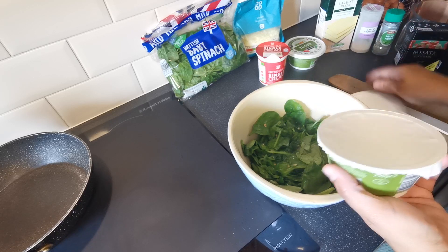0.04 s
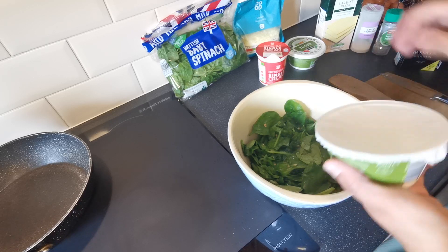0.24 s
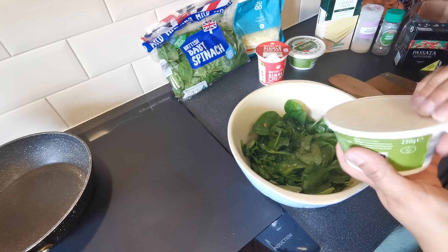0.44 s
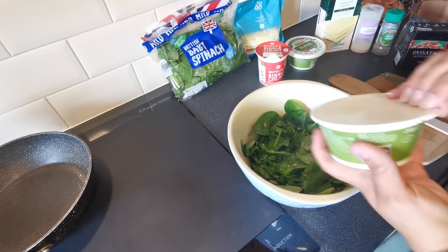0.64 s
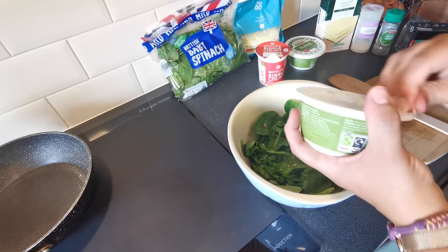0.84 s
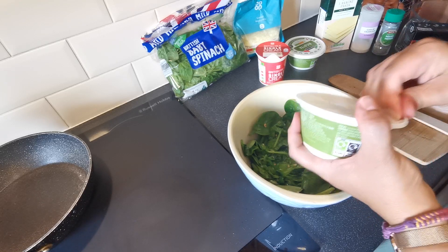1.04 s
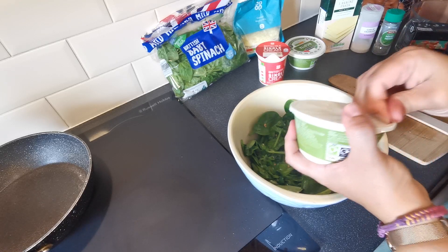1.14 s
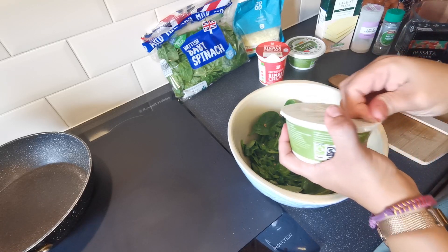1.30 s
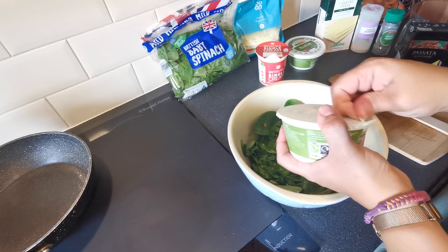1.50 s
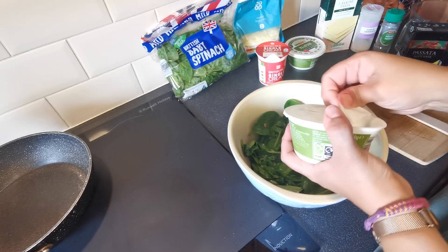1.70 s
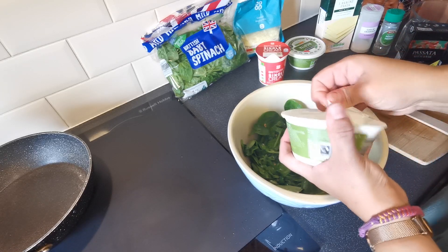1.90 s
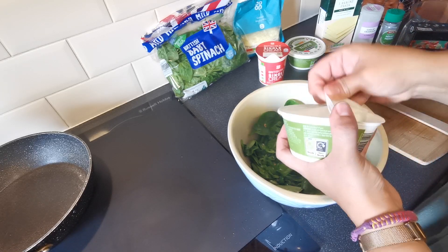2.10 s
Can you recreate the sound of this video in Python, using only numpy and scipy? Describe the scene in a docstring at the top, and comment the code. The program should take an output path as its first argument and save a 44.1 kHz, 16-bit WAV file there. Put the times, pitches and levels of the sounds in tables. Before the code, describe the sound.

A plastic tub is opened close by, slightly to the right, in a kitchen. At 0.2 seconds its lid drops on a wooden board and rattles to rest by 0.4. Fingers pick at the film seal, with sharp clicks near 0.6 and 1.0. From about 1.4 the seal peels with crinkles and pops, snapping again near 1.8 and 2.0. A faint, low appliance hum runs underneath.

```python
"""Dropped lid and peeled seal

A plastic lid drops on a wooden board in a tiled kitchen and rattles to rest. Fingers then pick at
a tub's film seal and peel it back: the glue lets go in tiny slips, the film crinkles and snaps,
and the thin tub pops. A low appliance hum runs underneath; the hands are near the right microphone."""
import sys
import numpy as np
from scipy import signal
from scipy.fft import rfft, irfft
from scipy.io import wavfile

SR = 44100
rng = np.random.default_rng(int(sys.argv[2]) if len(sys.argv) > 2 else 0)


def int16_out(signal):
    """Quantize to a 16-bit WAV file."""
    q = np.round(np.clip(np.atleast_2d(signal).T, -1, 1) * 32767)
    wavfile.write(sys.argv[1], SR, q.astype(np.int16))


N = 94815

# The lid's bounces. Each row: start in seconds, then thud, ring, crack and room echo levels in dB.
BOUNCES = [(0.2003, -30.5, -15, -25.5, 5.5), (0.2019, -24.5, -18.5, -10.5, 1.5),
           (0.208, -15, -32, -12.5, 0), (.2122, -19.5, -18.5, -32, 3), (0.2187, -48, -13.5, -14, 2.5),
           (.2252, -32.5, -20, -0.5, -2), (.2326, -39.5, -21, -21, -12), (0.3083, -44.5, -18, -19.5, 2),
           (0.3172, -34, -28, -22, 4.5), (0.3219, -39, -23.5, -41, -2), (.356, -58, -25.5, -30.5, 1.5),
           (.378, -61.5, -28, -28, 2), (.402, -42.5, -30.5, -48.5, 0)]
# The lasting notes of the lid and of nearby kitchenware ringing along.
# Each row: pitch in Hz, relative level in dB, seconds to fade by 60 dB.
RINGING_NOTES = [(1760, 0, .07), (1977, -1, .14), (2125, 1, .13), (2295, -5, .1), (3492, -9, .1),
                 (4266, -6, .08), (4556, -3, .09), (5521, -5, .09), (5647, -6, .09), (6769, -12, .08)]
# The tone of the board, the lid and its edge. Each row: frequency in Hz, relative level in dB.
BOARD_TONE = [(100, -32.5), (200, -13), (270, 7), (340, -6), (500, -5), (700, -9.5), (1250, -8),
              (2000, -21), (6000, -64)]
LID_TONE = [(300, -32.5), (900, -20), (1250, -14), (1550, -11.5), (1780, -3.5), (2150, 0.5), (2700, -5),
            (3500, -4.5), (6000, -21), (15000, -39.5)]
EDGE_TONE = [(300, -46.5), (1500, -27), (3300, -12), (4400, -3), (5300, -5), (6500, -9.5), (8200, -19.5),
             (11000, -12.5), (15500, -14)]


def dropped_lid():
    """Each bounce thumps the board, rings the lid and nearby kitchenware, and cracks at the lid's edge."""
    out, t = np.zeros((2, N)), np.arange(8192) / SR
    for start, thud_db, ring_db, crack_db, room_db in BOUNCES:
        notes = sum(amp(db - 60 * t / fade_s) * rng.choice([-1, 1]) * np.sin(2 * np.pi * hz * t)
                    for hz, db, fade_s in RINGING_NOTES)
        thud = amp(thud_db) * unit(colour(burst(fade_ms=2.3075, size=len(t)), BOARD_TONE))
        ring = amp(ring_db) * unit(colour(burst(fade_ms=3.145, size=len(t)), LID_TONE))
        ring += amp(ring_db - 5) * unit(notes)
        crack = amp(crack_db) * unit(colour(burst(fade_ms=0.4775, size=len(t)), EDGE_TONE))
        add(out, start, kitchen(thud + ring + crack, room_db))
    return out


# Snaps of tub and film. Each row: start in seconds, wall pitch in Hz, wall level in dB, rim pitch in Hz,
# rim band width in Hz, rim level in dB, film level in dB, fade time in milliseconds, room echo in dB.
SNAPS = [(0.0399, 1212, -60, 5797, 2996, -51.5, -47, 0.881, -5),
         (0.0797, 1199, -59.5, 5862, 3003, -50.5, -42, 0.3005, -8),
         (0.096, 1204, -67, 4974, 1992, -48.5, -50.5, 0.99, 5.5),
         (0.5041, 1177, -38.5, 2500, 2514, -43.5, -53, 0.5946, 3),
         (.5703, 1231, -51.5, 5647, 1463, -44, -45, 0.797, 3.5),
         (0.5946, 1100, -40.5, 3980, 3035, -40.5, -34.5, 1.541, 1.5),
         (0.603, 1516, -45, 5459, 1492, -33.5, -37.5, 1.716, 11),
         (.609, 1954, -29.5, 5671, 900, -11.5, -8, 1.1526, -6.5),
         (0.9079, 1482, -39, 5616, 3478, -28, -22.5, 2.1, 1.5),
         (0.9142, 1204, -37, 5616, 3478, -29, -26, 1.284, -1.5),
         (.9315, 1497, -53, 5547, 3000, -40, -26, 0.84, -1),
         (0.9535, 1407, -35.5, 4056, 3002, -36.5, -39.5, 3.177, 4),
         (0.9561, 1244, -30.5, 5500, 2998, -40.5, -27, 0.5847, 1),
         (.9731, 798.6, -27.5, 4802, 2271, -13, -8, 0.3152, -2.5),
         (1.0006, 900, -16, 2970, 2496, -30.5, -41.5, 0.2467, -9),
         (1.006, 977.2, -21.5, 2896, 2483, -23.5, -47.5, 3, -1),
         (1.014, 1000, -48, 4007, 3000, -33, -25, 0.526, -14),
         (1.1232, 1160, -55.5, 5947, 3000, -61, -40.5, 0.504, -17),
         (1.1814, 2019, -44.5, 4498, 3036, -40, -40.5, 0.512, 0.5),
         (1.278, 770.5, -38, 4000, 3000, -51.5, -54, 0.7474, 2.5),
         (1.2944, 1164, -34.5, 5604, 3467, -33.5, -33, 1.429, -3.5),
         (1.4231, 1800, -58, 5880, 1500, -27.5, -27.5, 1.458, 2.5),
         (1.426, 1757, -43, 6025, 1781, -24.5, -39.5, 2.12, 4),
         (1.457, 1794, -51, 5822, 3003, -29.5, -34, 1.348, -3.5),
         (1.513, 1202, -48.5, 5969, 3000, -50, -35, 0.92, -10.5),
         (1.5176, 1192, -47, 5978, 2995, -43, -26.5, 0.684, -2.5),
         (1.5664, 1180, -58.5, 6426, 3004, -37.5, -25.5, 0.3007, -4.5),
         (1.569, 1111, -42, 6454, 3000, -40.5, -41, 0.821, 6.5),
         (1.595, 1142, -38.5, 6380, 3002, -34.5, -21, 0.1804, 4),
         (1.6238, 1204, -18, 5072, 2970, -25, -31.5, 10.474, 0.5),
         (1.6508, 1242, -20, 2856, 2970, -15, -17, 0.4205, -2.5),
         (1.6687, 1284, -28, 2404, 1502, -29.5, -30.5, 1.322, -10.5),
         (1.6925, 1296, -23.5, 2113, 900, -17.5, -33, 0.592, -4),
         (1.7189, 1138, -25, 2320, 1501, -34.5, -32.5, 1.504, 1.5),
         (1.7322, 1934, -31, 5113, 3043, -27.5, -25.5, 1.153, -2),
         (1.8416, 1422, -19.5, 5915, 1015, -10.5, -6.5, 1.037, -4),
         (1.8437, 1259, -26.5, 6275, 2545, -18.5, -8, 0.4045, 1.5),
         (1.924, 1161, -31.5, 3981, 3002, -33, -27.5, 1.4436, -5.5),
         (2.0452, 1833, -16, 6623, 2227, -16.5, -27.5, 0.6306, -3),
         (2.0456, 879.6, -33.5, 4607, 3050, -24, -28, 1.75, 2.5)]
# The tone of the rim and of the film. Each row: frequency in Hz, relative level in dB.
RIM_TONE = [(200, -28), (600, -12), (1100, -5), (2000, 1), (4000, -2), (7000, -2.5), (9000, -4),
            (16000, -17.5)]
FILM_TONE = [(500, -41.5), (2000, -22), (4000, -18.5), (8000, -14), (10500, -3), (13000, 0.5), (14200, -1),
             (15500, 0), (17000, -19)]


def tub_snaps():
    """Buckling plastic pops the tub wall, clicks the rim and ticks the film; the grip sets the pitches."""
    out = np.zeros((2, N))
    wall_spread = 1.2557  # the wall rings from this factor below its pitch to this factor above
    film_slower = 3.398  # the limp film crinkles this many times longer than the wall
    for start, wall_hz, wall_db, rim_hz, rim_width, rim_db, film_db, fade_ms, room_db in SNAPS:
        wall_band = signal.butter(2, [wall_hz / wall_spread, wall_hz * wall_spread], "bandpass", fs=SR)
        rim_band = signal.iirpeak(rim_hz, rim_hz / rim_width, fs=SR)
        pop = amp(wall_db) * unit(signal.lfilter(*wall_band, burst(fade_ms)))
        click = amp(rim_db) * unit(colour(signal.lfilter(*rim_band, burst(fade_ms)), RIM_TONE))
        tick = amp(film_db) * unit(colour(burst(fade_ms * film_slower), FILM_TONE))
        add(out, start, kitchen(pop + click + tick, room_db))
    return out


# Gripping, then peeling the seal. Each row: time in seconds, film crackle in dB, tub rasp in dB.
PEEL_LEVELS = [(0, -78, -88.5), (.09, -83, -88.5), (.11, -71.5, -73), (.17, -90, -75), (.74, -75, -80.5),
               (.8, -68.5, -71), (.88, -76.5, -71.5), (1.12, -76, -104.5), (1.4, -74.5, -79.5),
               (1.46, -59.5, -63.5), (1.55, -73, -87), (1.59, -63.5, -82.5), (1.61, -49, -62.5),
               (1.644, -53.5, -53.5), (1.663, -46, -43), (1.69, -62.5, -58), (1.72, -59, -53.5),
               (1.77, -64, -68.5), (1.82, -70.5, -68), (2.15, -80.5, -70)]
# The tone of the tub's rasp. Each row: frequency in Hz, relative level in dB.
RASP_TONE = [(200, -19), (650, -7.5), (1000, -6), (1250, -2.5), (1700, -7), (2300, 0.5), (3300, -11.5),
             (5200, -4.5), (8000, -15), (16000, -22.5)]


def peeling_seal():
    """The glue lets go in many tiny slips, which crackle in the film and rasp in the tub."""
    slips_per_second, spread_db = 2200, 4
    times, film_db, tub_db = np.transpose(PEEL_LEVELS)
    t = np.arange(N) / SR
    slips = (rng.random(N) < slips_per_second / SR) * rng.choice([-1, 1], N)
    slips = slips * amp(spread_db * np.minimum(rng.exponential(1, N), 4))  # a few are much louder
    crackle = amp(np.interp(t, times, film_db)) * unit(colour(slips, FILM_TONE))
    rasp = amp(np.interp(t, times, tub_db)) * unit(colour(slips, RASP_TONE))
    return kitchen((crackle + rasp) * np.sqrt(N), room_db=-3)[:, :N]


# How long the kitchen echoes. Each row: frequency in Hz, seconds to fade by 60 dB.
ECHO_FADE = [(200, 0.0008), (800, 0.3424), (2100, 0.2809), (5500, 0.3969), (9000, 0.318), (15000, 0.1571)]
# The tone of the echo. Each row: frequency in Hz, boost or cut in dB.
ECHO_TONE = [(200, 0.5), (900, -2), (2200, 0.5), (5500, -2), (9000, 0), (15000, -2.5)]
# Direct sound and echo at the left microphone. Each row: frequency in Hz, dB relative to the right.
LEFT_DIRECT = [(200, 1), (1200, -3.5), (2200, -5), (4500, 2.5), (5600, -6.5), (7000, -7), (9500, -43.5),
               (12000, -31.5), (16000, -27.5)]
LEFT_ECHO = [(200, -6), (1200, 2.5), (2400, 0.5), (4500, 0.5), (8000, 5.5), (10500, -3), (12500, -10.5),
             (16000, -5.5)]


def kitchen(sound, room_db):
    """Sound arrives directly, shaded on the left, and as a dense echo off the tiles."""
    bass_hz, left_delay_s = 900, 0.0001
    rise_s, early_db, early_s = 0.00112, 7, 0.004975
    hz, t, (a, b) = signal.stft(rng.standard_normal((2, 20480)), SR, nperseg=256)
    alike = np.exp(-(hz / bass_hz) ** 2)[:, None]  # the echo's bass is alike on both sides
    noise = np.array([alike * a + np.sqrt(1 - alike ** 2) * b, a])
    fade = amp(-60 * t / look_up(ECHO_FADE, hz)[:, None])
    tail = signal.istft(noise * fade, SR, nperseg=256)[1]
    t = np.arange(tail.shape[1]) / SR
    tail *= 1 - np.exp(-(t / rise_s) ** 2)
    tail *= amp(early_db * np.exp(-t / early_s))  # the first reflections are the strongest
    toned = amp(room_db) * colour(sound, ECHO_TONE)
    left, right = (signal.fftconvolve(toned, unit(side)) for side in tail)
    out = np.array([colour(left, LEFT_ECHO), right])
    add(out[:1], left_delay_s, colour(sound, LEFT_DIRECT)[None])
    add(out[1:], 0, sound[None])
    return out


# The hum's notes. Each row: pitch in Hz, level in dB before each side gets its own gain.
HUM_NOTES = [(49.6, -64.5), (99.8, -66), (143, -76.5)]


def appliance_hum():
    """An appliance hums on the left, its low notes wavering in loudness and pitch."""
    waver, left_db, right_db = 0.3, 3.5, -5.5
    hum, t = np.zeros(N), np.arange(N) / SR
    for hz, db in HUM_NOTES:
        level = amp(db) * np.sqrt(2) * (1 + waver * drift(rate_hz=5))
        hum += level * np.sin(2 * np.pi * hz * t + waver * drift(rate_hz=2.5))
    return hum * amp([[left_db], [right_db]])


# Two curves that add up to the room noise's tone. Each row: frequency in Hz, relative level in dB.
NOISE_TONE = [(15, -10), (25, -1.5), (70, -8), (108, -2), (270, -16.5), (607, -20.5), (734, -24.5),
              (1130, -30), (1260, -31), (2000, -38.5), (8360, -58.5), (14000, -48), (16000, -70.5)]
NOISE_CONTOUR = [(30, -2.5), (50, -16), (100, -3), (150, -1.5), (250, -3), (380, 4), (500, -1), (800, 1.5),
                 (1300, 3.5), (3000, 9.5), (8000, 16.5), (15000, -2.5)]
# How alike the two sides are. Each row: frequency in Hz, likeness from 0 (unrelated) to 1 (the same).
NOISE_LIKENESS = [(50, 0.8186), (300, 0.9537), (700, 0.2221), (1500, 0.0744), (15000, .1)]
# Which way the noise leans. Each row: frequency in Hz, left level minus right level in dB.
NOISE_BALANCE = [(50, -4.5), (130, 7.5), (300, 0.5), (1500, 2.5), (6000, 3), (14000, -1)]


def room_noise(level_db=-61):
    """The room rumbles and hisses, faintly and steadily."""
    hz = np.fft.rfftfreq(N, 1 / SR)
    a, b = rfft(rng.standard_normal((2, N)))
    alike = look_up(NOISE_LIKENESS, hz)
    lean = amp(look_up(NOISE_BALANCE, hz) / 2)
    noise = np.array([a * lean, (alike * a + np.sqrt(1 - alike ** 2) * b) / lean])
    tone = amp(look_up(NOISE_TONE, hz) + look_up(NOISE_CONTOUR, hz))
    return amp(level_db) * unit(irfft(noise * tone, N)) * np.sqrt(2 * N)


def burst(fade_ms, size=4096):
    """One sharp click and a quickly dying cluster of tiny slips, with an even tone."""
    slip_share = 0.93  # the slips' part of the energy
    t_ms = np.arange(size) * 1000 / SR
    slips = unit(rng.standard_normal(size) * np.exp(-t_ms / fade_ms))
    spectrum = np.fft.fft(np.sqrt(1 - slip_share) * (t_ms == 0) + np.sqrt(slip_share) * slips)
    bumps = quickest_filter(np.log(abs(spectrum) ** 2 + 0.05) / 2)
    even = np.fft.ifft(spectrum / bumps).real
    return unit(even * (t_ms < t_ms[-1] / 2))


def colour(sound, tone, size=2048):
    """Filters a sound so that it takes on the tone in a table."""
    hz = abs(np.fft.fftfreq(size, 1 / SR))
    response = np.fft.ifft(quickest_filter(np.log(amp(look_up(tone, hz))))).real
    return signal.fftconvolve(sound, response[:size // 2])[:len(sound)]


def quickest_filter(log_gain):
    """The spectrum of the quickest filter with these gains that never sounds ahead of its input."""
    return np.exp(np.conj(signal.hilbert(log_gain)))


def drift(rate_hz):
    """A slow random wander with a typical size of 1."""
    hz = np.fft.rfftfreq(N, 1 / SR)
    slow = rfft(rng.standard_normal(N)) * np.exp(-(hz / rate_hz) ** 2)
    return unit(irfft(slow, N)) * np.sqrt(N)


def look_up(table, hz):
    """Reads between a table's rows, with frequencies spaced like musical pitch."""
    row_hz, values = np.transpose(table)
    return np.interp(np.log(hz + 1), np.log(row_hz + 1), values)


def amp(db):
    """Turns decibels into a multiplier."""
    return 10 ** (np.asarray(db) / 20)


def unit(sound):
    """Scales a sound to a total energy of 1."""
    return sound / np.sqrt(np.sum(sound ** 2) + 1e-20)


def add(mix, start_s, sound):
    """Mixes a sound in at its start time, cutting off what does not fit."""
    part = mix[:, round(start_s * SR):][:, :sound.shape[1]]
    part += sound[:, :part.shape[1]]


def scene():
    """The lid, the tub and its seal over the kitchen's background, in stereo."""
    return dropped_lid() + tub_snaps() + peeling_seal() + room_noise() + appliance_hum()


def record(dry):
    """The recorder cuts the highest treble, above 16200 Hz."""
    low_pass = signal.firwin(255, 16200, window=("kaiser", 9), fs=SR)
    return signal.oaconvolve(dry, low_pass[None], "same")


dry = scene()
out = record(dry)
int16_out(out)
```